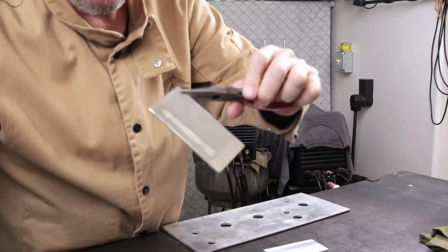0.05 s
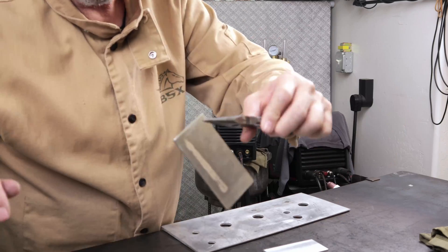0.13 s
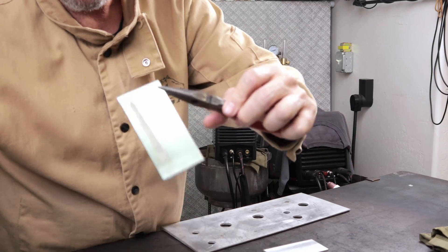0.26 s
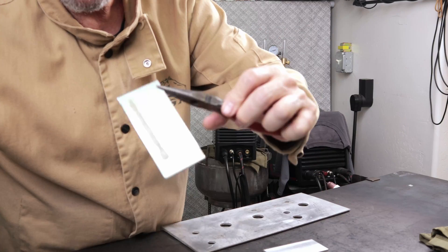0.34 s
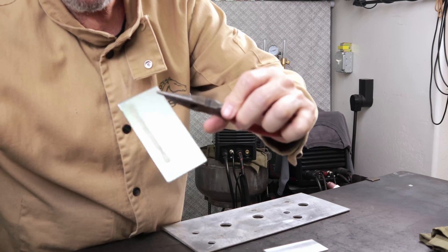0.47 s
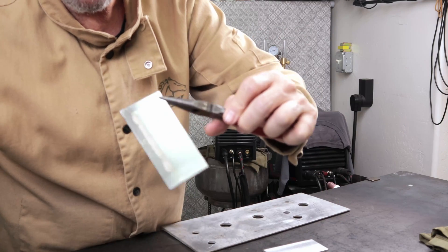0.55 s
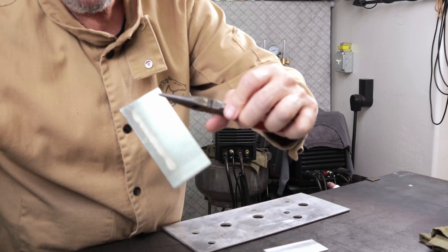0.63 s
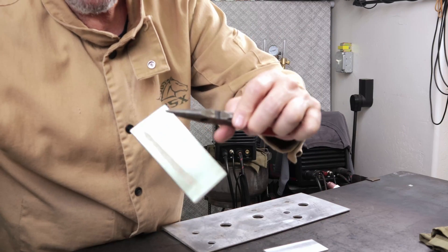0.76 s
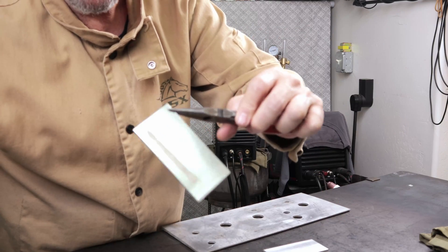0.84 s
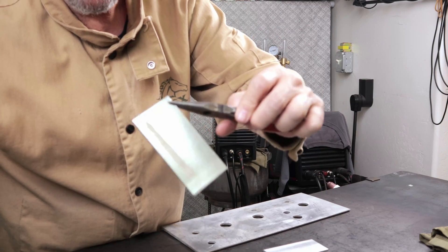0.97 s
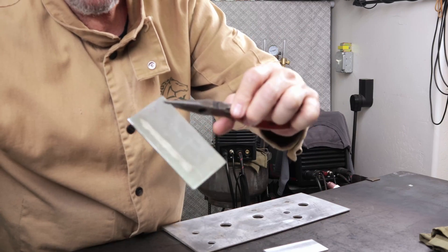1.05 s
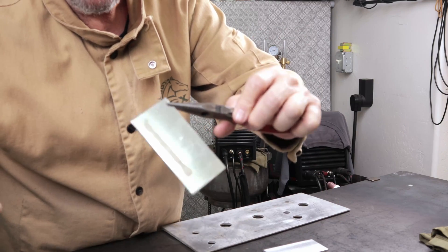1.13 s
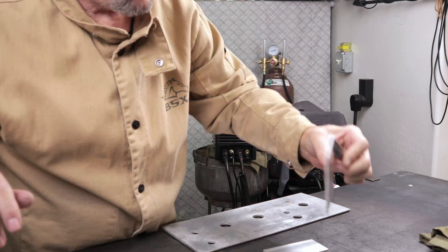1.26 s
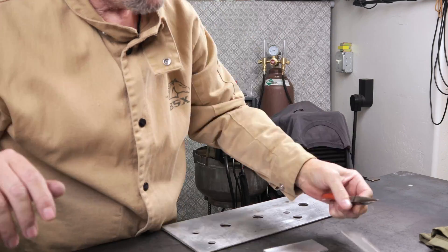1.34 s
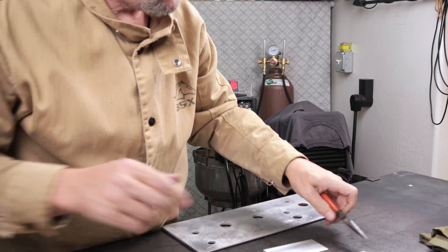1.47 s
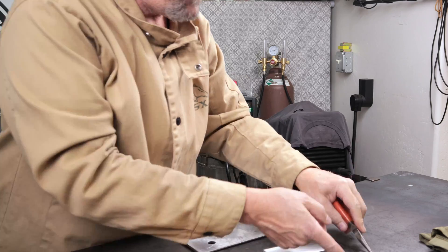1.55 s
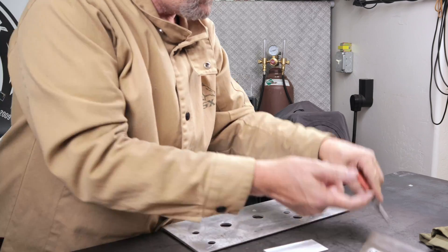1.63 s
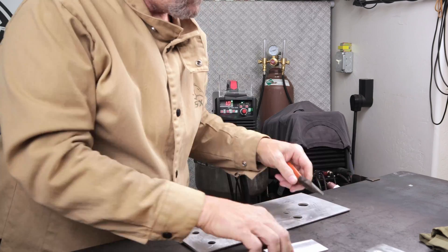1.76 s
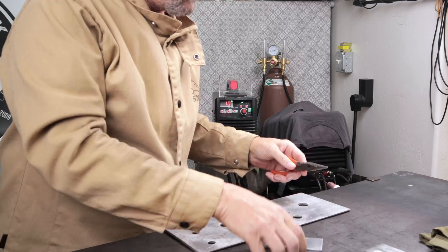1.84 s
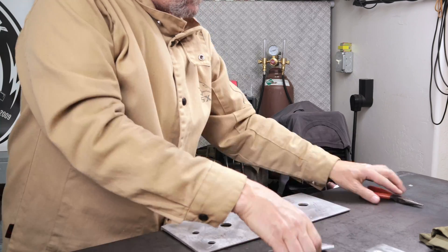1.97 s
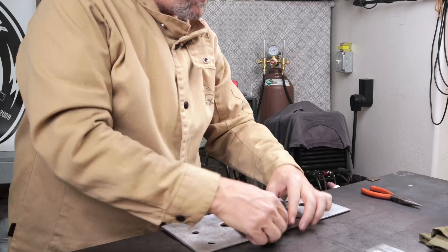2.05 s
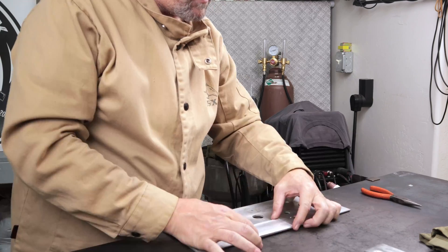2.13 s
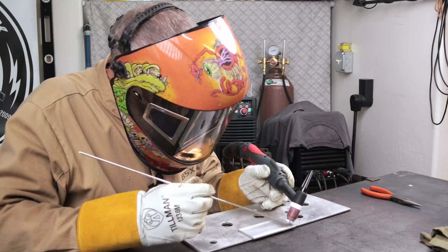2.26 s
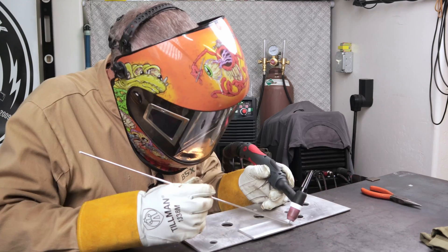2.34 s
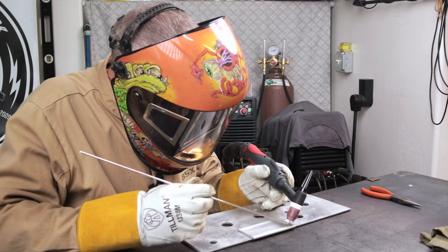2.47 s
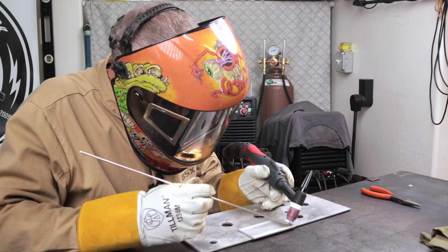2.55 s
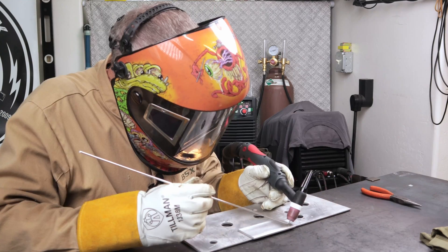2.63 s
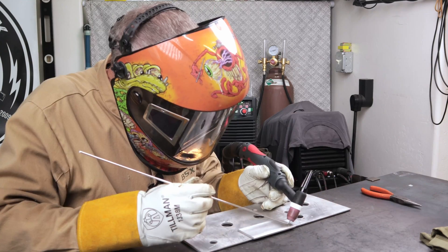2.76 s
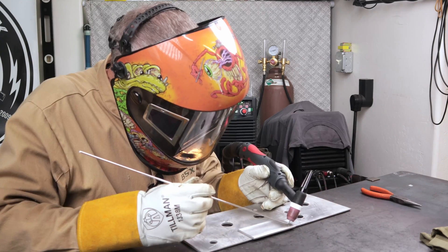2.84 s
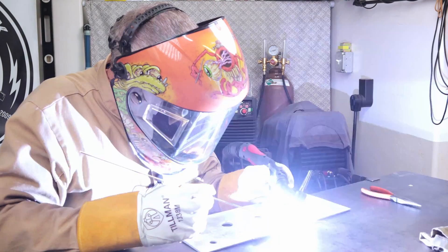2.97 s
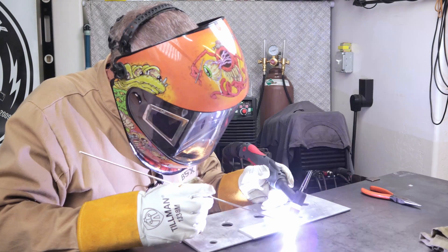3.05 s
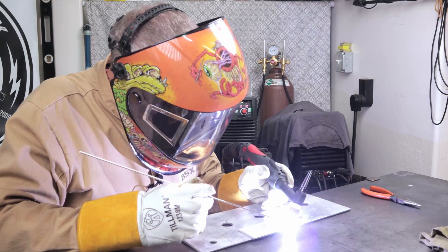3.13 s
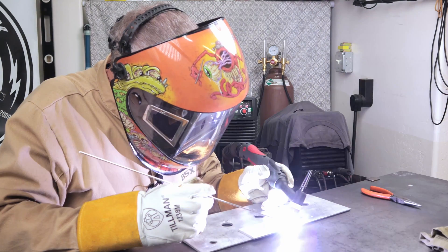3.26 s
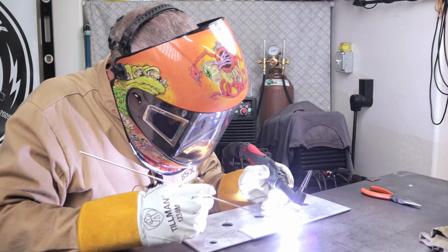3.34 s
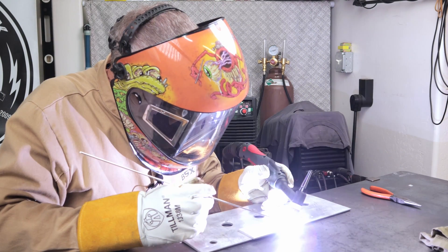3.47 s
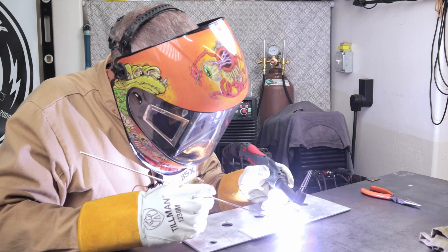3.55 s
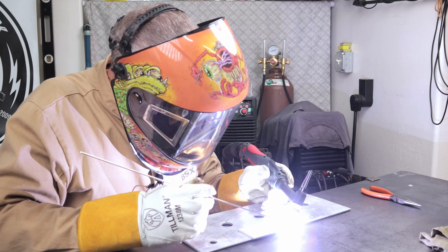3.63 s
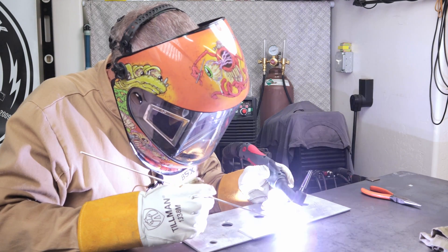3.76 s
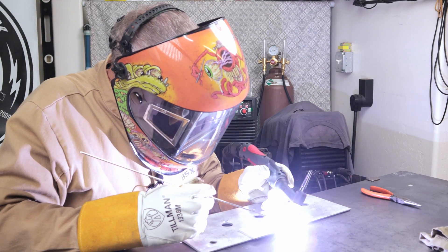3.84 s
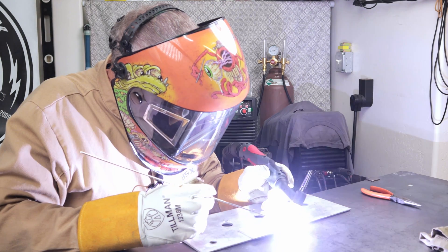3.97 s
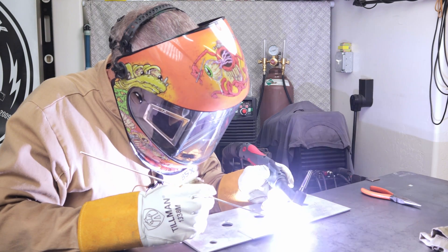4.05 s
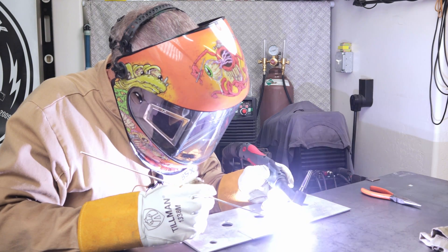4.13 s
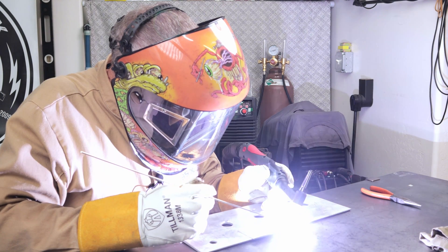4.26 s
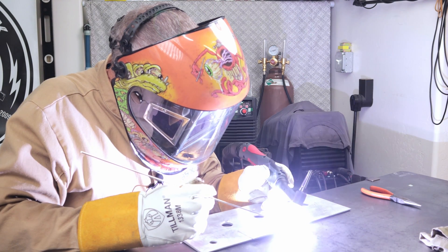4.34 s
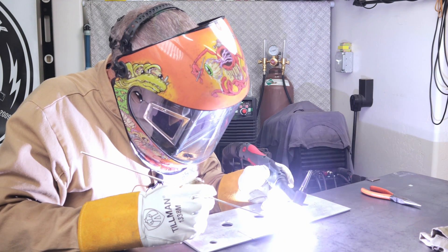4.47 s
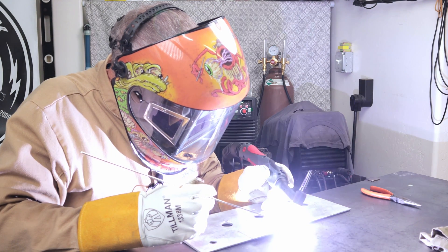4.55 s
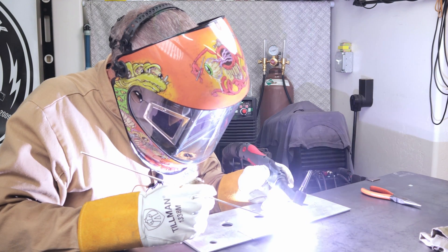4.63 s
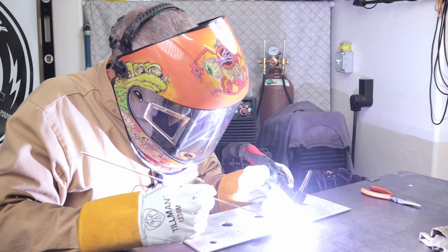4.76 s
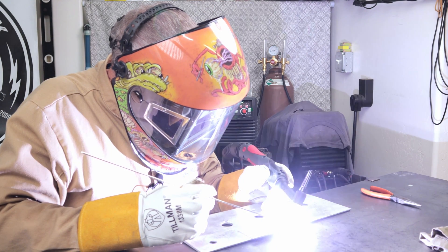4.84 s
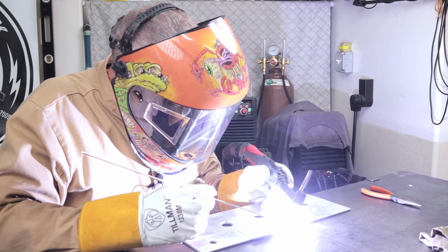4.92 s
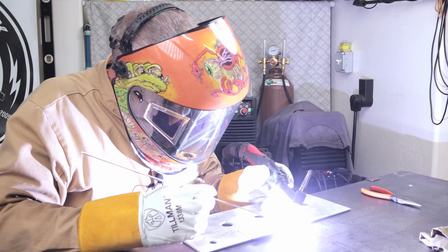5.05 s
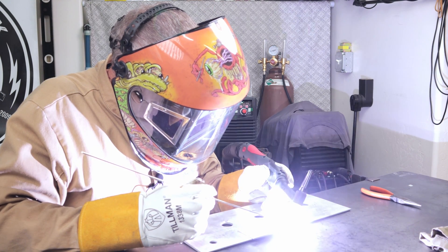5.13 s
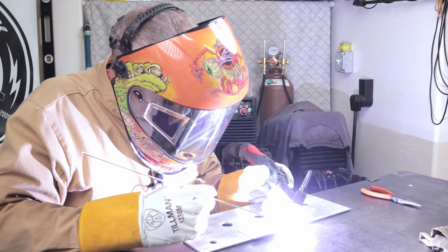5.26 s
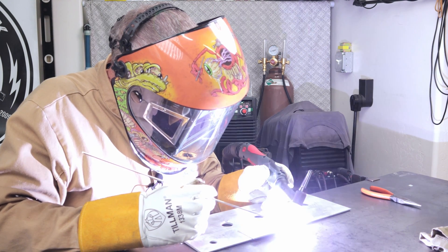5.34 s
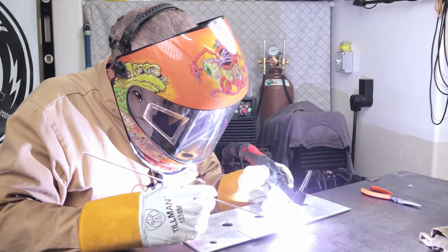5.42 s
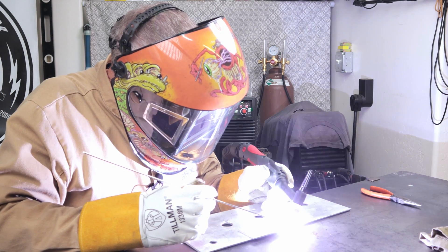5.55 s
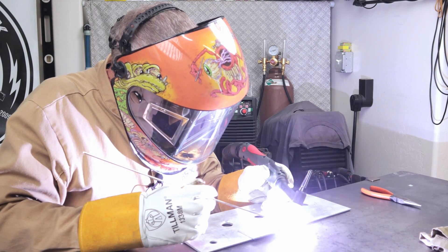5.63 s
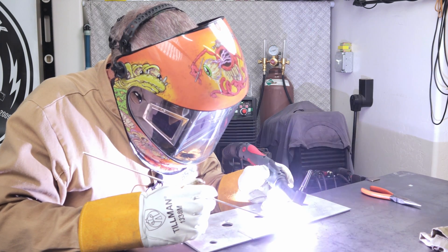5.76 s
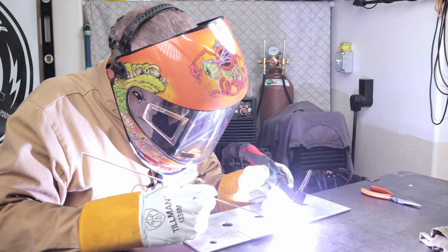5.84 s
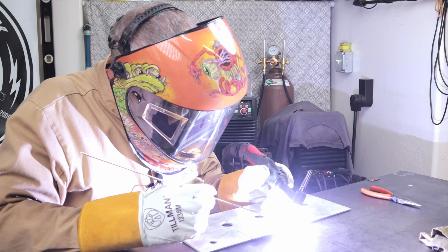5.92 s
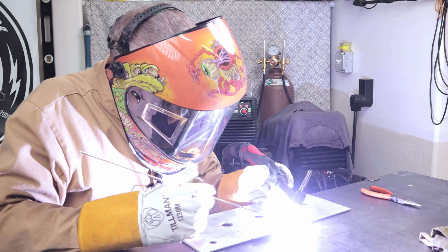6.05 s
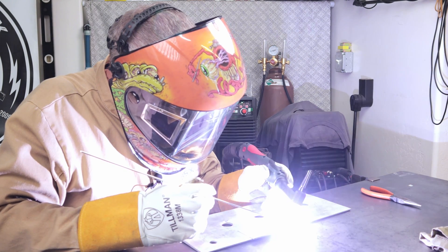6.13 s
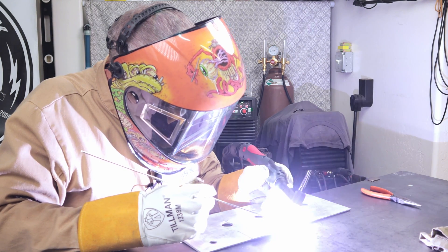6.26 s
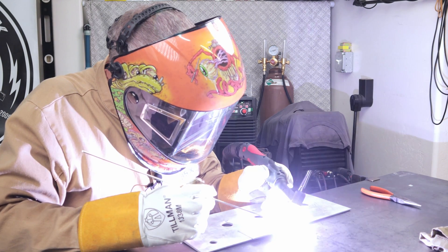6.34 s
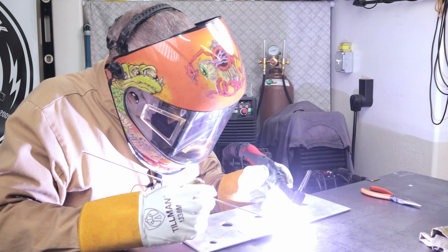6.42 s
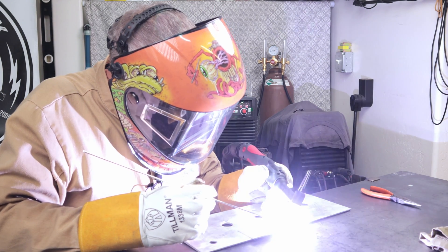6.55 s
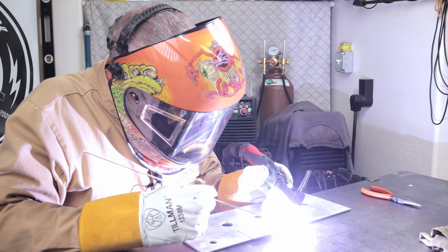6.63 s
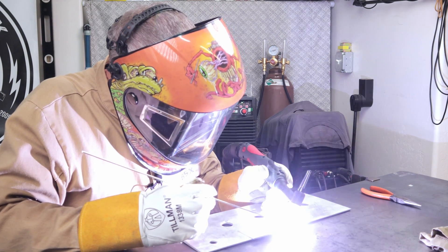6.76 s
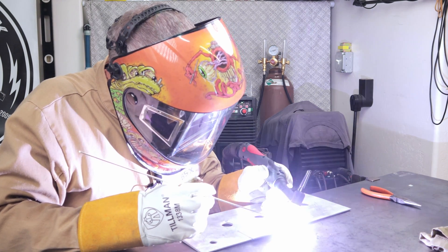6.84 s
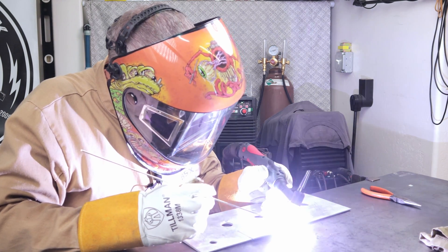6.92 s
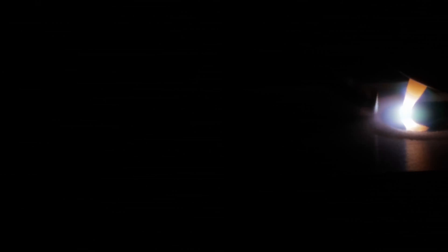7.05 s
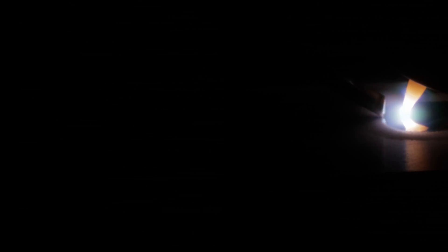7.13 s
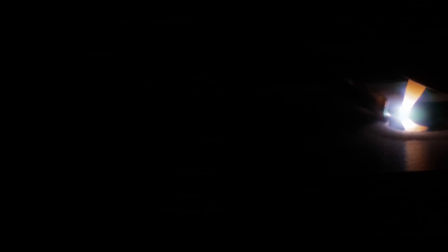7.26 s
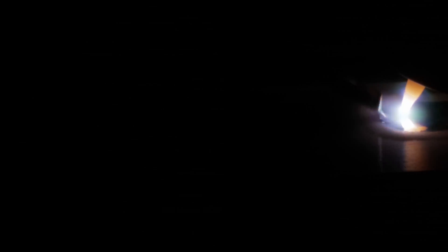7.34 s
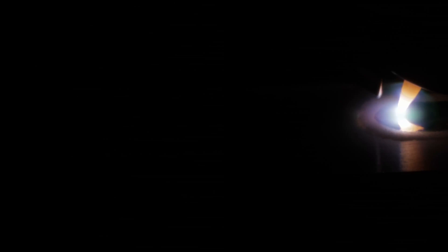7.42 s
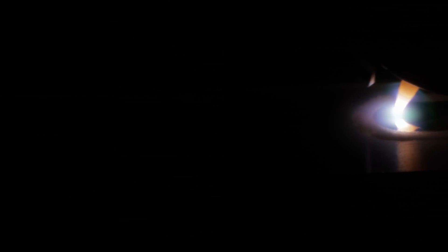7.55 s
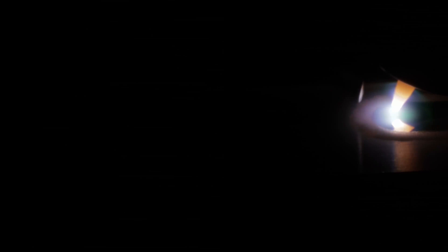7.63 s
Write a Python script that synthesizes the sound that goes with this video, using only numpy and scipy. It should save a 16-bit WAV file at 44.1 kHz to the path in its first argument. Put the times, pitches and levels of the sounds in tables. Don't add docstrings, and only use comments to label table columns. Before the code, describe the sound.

Workshop fan whine, metal clinks on a bench, a cut, a gas spit, then a crackling overloaded strike and an even, bright electric arc buzz.

```python
import sys
import numpy as np
from scipy import signal
from scipy.io import wavfile
from scipy.ndimage import uniform_filter1d

SR = 44100
rng = np.random.default_rng(int(sys.argv[2]) if len(sys.argv) > 2 else 0)


def invert_db(x):
    u = np.asarray(x, float) / 20
    return 10 ** u


def generate_wav(sig):
    pcm = np.round(np.clip(np.atleast_2d(sig).T, -1, 1) * 32767).astype(np.int16)
    wavfile.write(sys.argv[1], SR, pcm)


N = 339129
T = np.arange(N) / SR
CUT, STRIKE, LIT = 2.293, 3.0086, 3.0577
CYCLE_HZ, SECOND_S = 119.575, 0.00293

# (frequency [Hz], t60 [s], level at first reversal [dB], level at second reversal [dB], signed weight)
CUP_MODES = [(1040, 0.002, 0, -5, 0.6), (1333, 0.024, -18.5, -41, -0.35), (2090, 0.0061, -16.5, -34, 0.16),
             (2875, 0.0016, -53, 11, 0.95), (3433, 0.0051, -2.5, 0.5, 0.94), (3855, 0.0046, 0.5, 0.5, 0.96),
             (5340, 0.0033, 10.5, 6.5, 0.37), (6260, 0.005, -31, 2.5, 0.6), (7707, 0.0038, 6.5, 3, 1),
             (9060, 0.0036, 4, 2.5, 0.98), (11200, 0.0074, -5, -8, -1.23), (11425, 0.0048, -4, -5.5, 1),
             (13000, 0.0077, -12, -10, -1.2), (14700, 0.0034, -10, -10, 1)]


def evened(x):
    return x / np.sqrt(np.mean(x ** 2) + 1e-20)


def read(points, hz):
    f, value = np.transpose(points)
    return np.interp(np.log(hz + 1), np.log(f + 1), value)


def add(mix, s, sound):
    part = mix[round(s * SR):][:len(sound)]
    part += sound[:len(part)]


def noise(spectrum, patchy_db):
    hz = np.fft.rfftfreq(1024, 1 / SR)
    a, b, patches = rng.standard_normal((N // 256 + 5, 513, 3)).T
    patches = uniform_filter1d(patches, size=8, axis=0)
    patches = evened(uniform_filter1d(patches, size=12, axis=1))
    z = (a + 1j * b) * invert_db(read(spectrum, hz)[:, None] + patchy_db * patches)
    return evened(signal.istft(z, nperseg=1024, noverlap=768)[1][:N])


def band(x, lo_hz, hi_hz):
    return signal.sosfilt(signal.butter(2, [lo_hz, hi_hz], "bandpass", fs=SR, output="sos"), x)


def notch(x, hz, sharpness):
    return signal.lfilter(*signal.iirnotch(hz, sharpness, SR), x)


def reversals():
    wander_s, wander_hz = 7e-5, 0.45
    early_s, settle_s = 1e-5, 1.2
    late_s, late_every, late_width, late_drift = 2.5e-5, 3.19, 0.17, 0.08
    first = LIT + np.arange(int((N / SR - LIT) * CYCLE_HZ) + 1) / CYCLE_HZ
    age = first - LIT
    beat = np.cumsum(1 + late_drift * rng.standard_normal(len(first))) / late_every % 1 - 0.5
    lag = wander_s * np.sin(2 * np.pi * wander_hz * age) + late_s * np.exp(-(beat / late_width) ** 2)
    back = first + lag + SECOND_S - early_s * np.exp(-age / settle_s)
    times = np.array([first + lag, back]).T
    times = times + 3e-6 * rng.standard_normal(times.shape)
    return times.ravel(), np.tile([0, 1], len(first))


def snap(t, levels_db, tuning, ring):
    since = np.maximum(t + 7e-5, 0)
    total = 0
    for (hz, t60, *_, sign), db in zip(CUP_MODES, levels_db):
        decay = t60 * ring ** (hz > 3700)
        tuned_hz = hz * tuning ** (hz / 8000) ** 3
        total = total + sign * invert_db(db - 60 * since / decay) * np.cos(2 * np.pi * tuned_hz * t)
    return (1 - np.exp(-since / 0.00009)) * total


def arc():
    # (time [s], arc level [dB], cable pickup level [dB])
    strength = [
        (3.061, -22, -68),
        (3.13, -28.5, -42),
        (3.5, -25.5, -35),
        (4.3, -21, -38.5),
        (5.2, -20, -44.5),
        (6.0, -20, -39),
        (7.3, -21, -39),
        (7.69, -22.5, -38.5),
    ]
    # (frequency [Hz], sharpness [Q])
    notches = [(720, 25), (1290, 6.1), (1620, 2.45), (2230, 74), (2700, 11.7), (3330, 12), (4430, 34),
               (5020, 150), (6260, 90)]
    at, second = reversals()
    s, *columns = np.transpose(strength)
    arc_db, pickup_db = (np.interp(at, s, c)[:, None] for c in columns)
    bright_db = 0.93 * (-19 - arc_db)
    age = at[:, None] - LIT
    tuning = 1.008 - 0.004 * age
    early = np.exp(-age / 1.7)

    start = (at * SR).astype(int)
    steps = np.arange(400) - 12
    t = steps / SR - (at - start / SR)[:, None] + 8e-5
    where = (start[:, None] + steps).ravel()

    def place(rows):
        return np.bincount(where, rows.ravel(), N + 900)[:N]

    chance = rng.standard_normal((len(at), len(CUP_MODES) + 1))
    levels_db = []
    for k, (hz, _, first_db, second_db, _) in enumerate(CUP_MODES):
        db = np.array([first_db, second_db])[second][:, None]
        db = db + bright_db * (hz > 5800) + 0.23 * chance[:, [k]]
        levels_db.append(db - 1.6 * early * (hz // 1000 == 7))
    snaps = snap(t, levels_db, tuning, 1 - 0.31 * early)
    heard = band(place(snaps * invert_db(arc_db + 0.46 * chance[:, -1:] + 8.5)), 760, 13200)
    for notch_hz, sharpness in notches:
        heard = notch(heard, notch_hz, sharpness)

    late = t - 1.4e-4
    spike = 0.055 * (late > 0) * np.exp(-np.maximum(late, 0) / 0.0016)
    spike = spike - 1.54 * np.exp(-(late / 6e-5) ** 2)
    needle = -0.45 * early ** 2.9 * np.exp(-(late / 4e-5) ** 2)
    leak = notch(band(place(spike * invert_db(pickup_db + 20.5) + needle), 280, 19000), 1560, 2.6)
    hum = (T > LIT) * invert_db(-54.0) * np.sin(2 * np.pi * CYCLE_HZ * (T - LIT))
    return heard, hum + leak


def overload():
    teeth_from, teeth_to = 3.0205, 3.052
    u = np.maximum(T - STRIKE - 3e-4, 0)
    kick = (T > STRIKE) * (T < teeth_from) * (0.6 * np.exp(-u / 0.0075) - 1.6 * np.exp(-u / 0.0012))

    on = (T >= teeth_from) & (T < teeth_to)
    w = np.clip(T - teeth_from, 0, 0.05)
    hz = 368 + 22 * np.exp(-w / 0.012)
    top = 0.34 + 0.53 * np.exp(-(w / 0.0072) ** 2)
    bottom = -(1 - np.exp(-(w / 0.0022) ** 2)) * (0.8 - 5.8 * w)
    phase = (np.cumsum(hz * on) / SR + 0.61) % 1
    charge = 0.36 * np.minimum(phase / 0.4, 1)
    charge = charge + 0.66 * (1 - np.exp(-np.maximum(phase - 0.4, 0) / 0.15))
    teeth = on * np.clip(w / 9e-4, 0, 1) * (bottom + (top - bottom) * charge)

    v = T - teeth_to
    after = np.maximum(v, 0)
    hump = (v > 0) * (0.39 * np.exp(-after / 0.0031) - 0.1 * np.exp(-after / 0.012))
    c = v - 3e-4
    crack = -0.55 * np.exp(-(c / 0.00012) ** 2) * np.cos(2 * np.pi * 7500 * c)
    return kick + teeth + hump + crack


def gas():
    # (frequency [Hz], density [dB per Hz])
    jet = [(710, -54), (1200, -43), (1310, -18), (1590, -7), (1970, -8), (2140, -8), (2330, -4.5),
           (2920, -6), (3740, -8), (5000, -8.5), (7930, -4.5), (9930, -7), (10800, -5), (12400, -8),
           (15600, -16)]
    # (time [s], frequency [Hz], level [dB], t60 [s])
    puffs = [
        (2.895, 2560, -28.5, 0.083),
        (2.905, 3590, -34, 1),
    ]
    valve_s, valve_db, valve_t60 = 2.872, -37, 0.065
    flow_s, flow_db, flow_db_per_s = 2.891, -33, 44
    hiss_db, hiss_db_per_s = -36.5, 1.1
    spit = (T > valve_s) * invert_db(valve_db - 60 * np.maximum(T - valve_s, 0) / valve_t60)
    swell_db = flow_db + flow_db_per_s * (T - flow_s)
    steady_db = hiss_db + hiss_db_per_s * (T - LIT)
    flow = (T > flow_s) * invert_db(np.where(T < LIT, swell_db, steady_db))
    out = uniform_filter1d(spit + flow, size=200) * noise(jet, patchy_db=0.8)
    air = rng.standard_normal(N)
    for s, hz, db, t60 in puffs:
        decay = (T > s) * invert_db(db - 60 * np.maximum(T - s, 0) / t60)
        out = out + decay * evened(band(air, hz * 0.96, hz * 1.07))
    return out


def rattle(events, modes):
    # (frequency [Hz], density [dB per Hz])
    knock_spectrum = [(470, -36), (800, -9.5), (1750, 4.5), (2450, -1), (3510, 4), (5090, -4.5), (7770, -4),
                      (9840, -13), (11100, -16), (15600, -28.5)]
    t, out = np.arange(8000) / SR, np.zeros(N)
    knock = noise(knock_spectrum, patchy_db=2.5)
    for s, db, t60, ring_db in events:
        rise = 0.00081 * invert_db(-0.27 * db)
        thud_db = -13 - (1 - 0.71) * db
        shape = (1 - np.exp(-t / rise)) * invert_db(-60 * t / t60)
        hit = shape * knock[round(s * SR):][:len(t)]
        uneven_db = 2.0 * rng.standard_normal(len(modes))
        plate = 0
        for (hz, mode_db, decay), u in zip(modes, uneven_db):
            plate = plate + invert_db(mode_db + u - 60 * t / decay) * np.sin(2 * np.pi * hz * t)
        ring = signal.fftconvolve(shape ** 2 * rng.standard_normal(len(t)), plate)[:len(t)]
        thud = band(shape * rng.standard_normal(len(t)), 440, 567)
        parts = hit / abs(hit).max()
        parts = parts + invert_db(ring_db) * ring / abs(ring).max()
        parts = parts + invert_db(thud_db) * thud / abs(thud).max()
        add(out, s, invert_db(db - 4.5) * parts)
    return out


def clatter():
    # (time [s], peak level [dB], t60 [s], ring level [dB])
    drops = [(1.4172, 2.5, 0.035, -6.5), (1.4234, -9, 0.046, 5), (1.4314, -9.5, 0.064, 11),
             (1.4424, -10.5, 0.08, -3), (1.4544, -11.5, 0.11, 12.5), (1.4644, -5, 0.028, 0),
             (1.4764, -12, 0.08, -2), (1.4904, -20, 0.034, 3), (1.6462, -24.5, 0.06, -26),
             (1.7195, -12.5, 0.055, -8), (1.7474, -12, 0.057, -24), (1.9091, -29, 0.06, -17),
             (1.9394, -37, 0.073, -19), (2.0477, -18, 0.031, -30), (2.0502, -13.5, 0.069, -28),
             (2.0704, -25.5, 0.068, -22), (2.0914, -42, 0.06, -20.5)]
    slides = [
        (2.1431, -25.5, 0.09, 6.5),
        (2.151, -23, 0.06, 1),
        (2.1619, -19.5, 0.043, -4.5),
    ]
    # (frequency [Hz], level [dB], t60 [s])
    scrap = [(2240, -34, .1), (2920, -13, 0.07), (4560, -5, 0.11), (5840, -16, 0.05), (6700, 1.5, 0.055),
             (7550, -1, 0.091), (8010, 8, 0.046), (8930, -1.5, 0.059), (10900, 0.5, 0.052),
             (11700, -6, 0.05), (14400, -16, .07)]
    blank = [(3250, 0.5, 0.057), (5730, -2.5, 0.063), (6700, -10, 0.095), (8850, 3, 0.054),
             (10450, -5, 0.046), (11900, 0, 0.044), (14200, -11, .06)]
    return rattle(drops, scrap) + rattle(slides, blank)


def ducking(metal):
    power_db = 10 * np.log10(abs(uniform_filter1d(metal ** 2, size=400)) + 1e-12)
    fall = T * 34
    held_db = np.maximum.accumulate(power_db + fall) - fall
    over_db = np.maximum(held_db + 28, 0)
    return -0.43 * uniform_filter1d(over_db, size=600)


def fan(duck_db):
    # (frequency [Hz], density [dB per Hz])
    air_far = [(15, -84), (25, -31), (120, -16.5), (200, -15), (340, -3), (450, -7.5), (700, -8.5),
               (970, -12.5), (1800, -20), (3500, -22.5), (6070, -25.5), (11600, -37.5), (15600, -53)]
    air_near = [(15, -59), (25, -29.5), (247, -17.5), (323, -10), (599, -14), (650, -9.5), (1030, -19),
                (1340, -24.5), (1580, -25), (1960, -25.5), (2120, -25.5), (8620, -39.5), (15600, -57)]
    # (multiple of blade rate, far level [dB], near level [dB])
    blade = [(1, -2, -1.5), (2, -29.5, -17), (3, -31, -13)]
    after, lit = T > CUT, T > STRIKE
    air = np.where(after, noise(air_near, patchy_db=1.0), noise(air_far, patchy_db=0.95))
    fade_db = 1.21 * 20 * np.log10(np.clip((CUT - T) / 0.66, 1e-2, 1))
    under_db = -45 + 5.3 * np.exp(-np.maximum(T - LIT, 0) / 0.2)
    far_air_db = -35.5 + 0.97 * fade_db + 0.7 * duck_db
    air_db = np.where(after, np.where(lit, under_db, -33), far_air_db)
    tone_db = np.where(after, -34 - 47.0 * lit, -25.5 + fade_db + duck_db)
    waver = evened(uniform_filter1d(rng.standard_normal(N), size=2500))
    turn = 2 * np.pi * np.cumsum(660 + 1.5 * waver) / SR
    tone = sum(invert_db(np.where(after, near_db, far_db)) * np.cos(k * turn) for k, far_db, near_db in blade)
    return invert_db(air_db) * air + np.sqrt(2) * invert_db(tone_db) * tone


def room(x):
    # (frequency [Hz], t60 [s])
    reverb = [(200, 0.78), (1000, 1), (4000, 1), (9000, 0.19), (15000, 0.68)]
    taps = np.zeros(SR // 2)
    at = np.arange(90, len(taps) - 20, 20)
    taps[at + rng.integers(0, 20, len(at))] = rng.choice([-1.0, 1.0], len(at))
    hz, t, z = signal.stft(taps, SR, nperseg=128)
    tail = signal.istft(z * invert_db(-60 * t / read(reverb, hz)[:, None]), SR, nperseg=128)[1]
    return signal.fftconvolve(x, tail / np.linalg.norm(tail))[:N]


def scene():
    snaps, pickup = arc()
    metal = clatter()
    heard = snaps + invert_db(-8.5) * room(snaps) + gas()
    heard = heard + metal + invert_db(-47) * room(metal) * (T < CUT) + fan(ducking(metal))
    deaf_db = np.interp(T, [STRIKE, STRIKE + 1e-4, 3.05, 3.0645, 3.0665], [0, -38, -28, -16, 0])
    spikes = sum(-0.75 * np.exp(-((T - s) / 4e-5) ** 2) for s in (LIT, LIT + SECOND_S))
    return (heard * invert_db(deaf_db) + pickup + spikes + overload())[None]


def top_cut(x):
    return signal.sosfilt(signal.butter(12, 15830, fs=SR, output="sos"), x)


def record(dry):
    return top_cut(np.clip(dry, -0.99, 0.99))


dry = scene()
out = record(dry)
generate_wav(out)
```